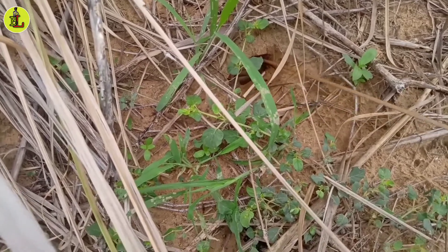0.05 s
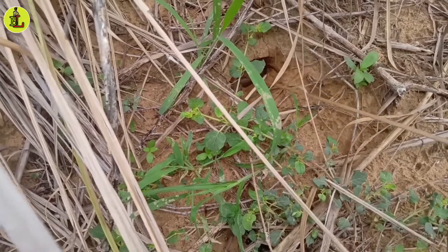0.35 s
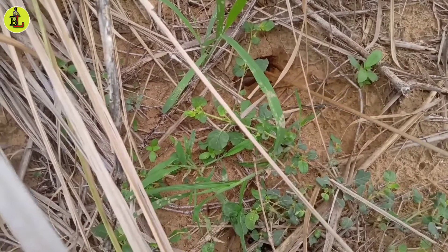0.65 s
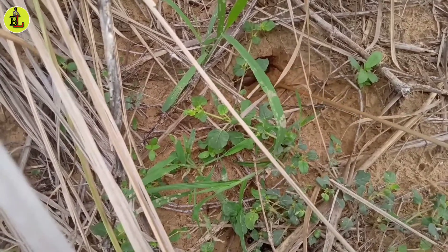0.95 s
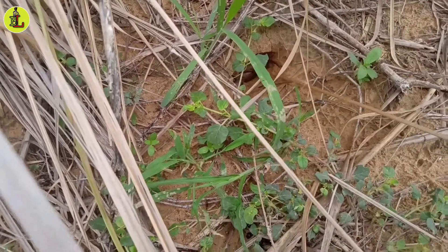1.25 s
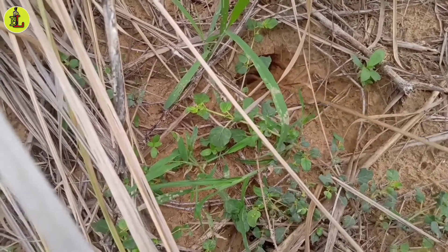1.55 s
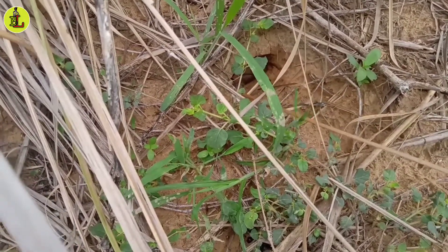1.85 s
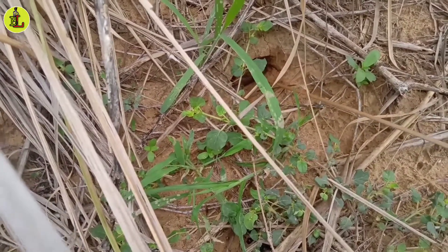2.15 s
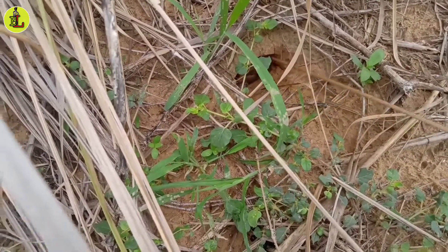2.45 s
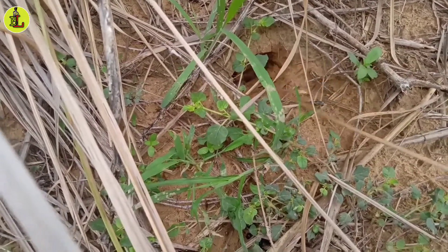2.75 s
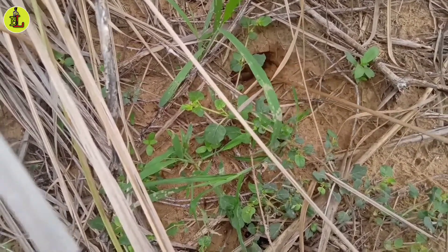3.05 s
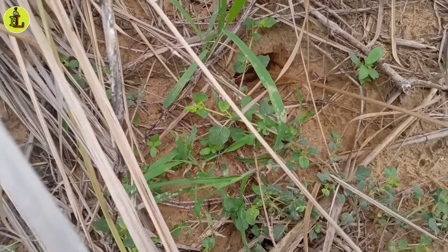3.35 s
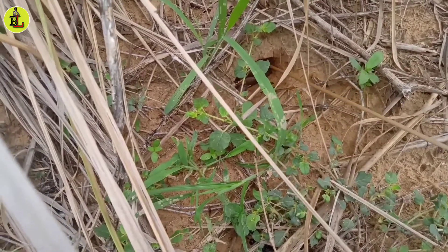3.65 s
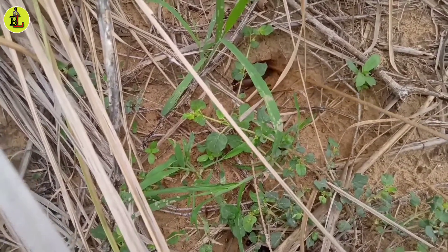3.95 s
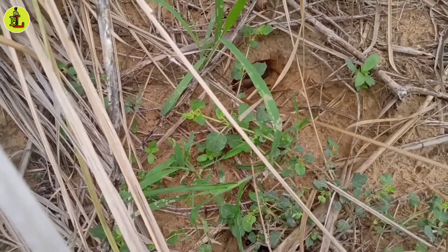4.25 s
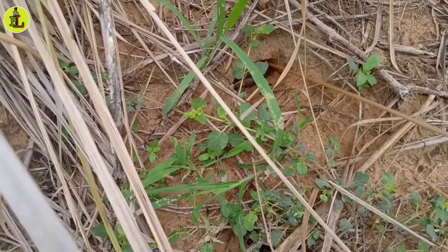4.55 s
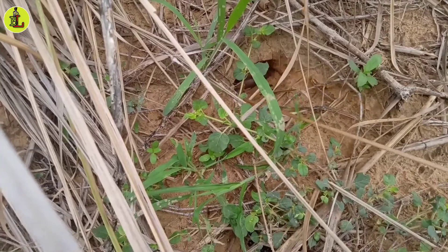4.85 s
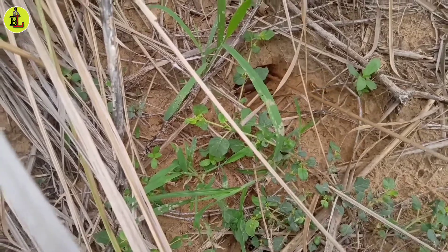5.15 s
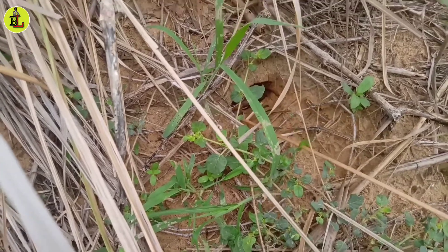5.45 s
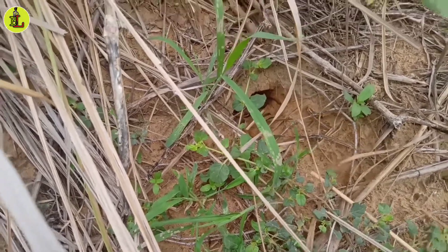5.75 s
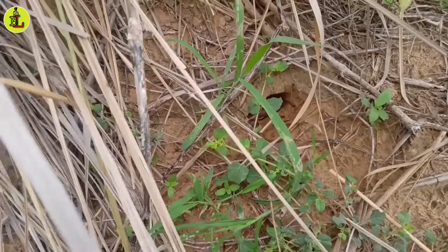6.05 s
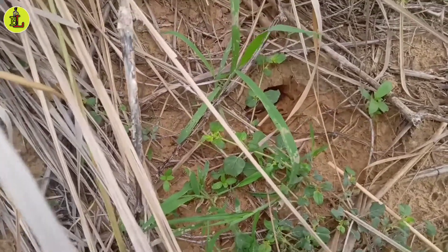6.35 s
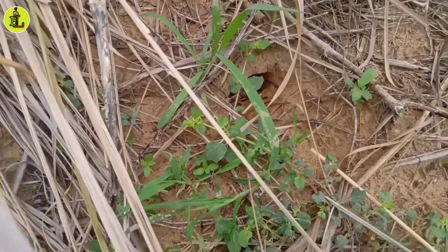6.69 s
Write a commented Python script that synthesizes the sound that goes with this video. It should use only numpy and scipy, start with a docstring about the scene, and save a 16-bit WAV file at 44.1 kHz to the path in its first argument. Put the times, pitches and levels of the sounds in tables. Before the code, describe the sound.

Close, scattered ticks and light scrapes of dry stalks outdoors, over a soft low rumble and distant bird calls.

```python
"""A quiet field, with dry grass disturbed close by. The blades move by stick-slip friction: they scrape
over each other, catch and snap free, and each release excites the damped modes of the stalks.
Small birds and a dove call far off in gliding tones, over a low rumble and a hush of air.
One thin, very high squeak arches up and down, loudest as its pitch crosses two resonances.
At the end a hand bumps the camera, whose body answers with a dull thump."""
import sys
import numpy as np
from scipy import signal
from scipy.fft import rfft
from scipy.io import wavfile
from scipy.ndimage import uniform_filter1d

SR = 44100
rng = np.random.default_rng(int(sys.argv[2]) if len(sys.argv) > 2 else 0)


def dump_mix(stems):
    """Bounce the given channels to the path in sys.argv[1] as a 16-bit WAV at rate SR."""
    frames = np.atleast_2d(stems).T  # one column per channel
    limited = np.clip(frames, -1, 1)  # hard clip at full scale
    pcm = np.round(limited * 32767).astype(np.int16)
    wavfile.write(sys.argv[1], SR, pcm)


N = 296376

# spectrum of the far rumble: (frequency [Hz], relative density [dB])
RUMBLE_SPECTRUM = [(20, -15), (40, -19.5), (70, -4.5), (110, -1), (155, 1.5), (200, -4), (260, -13.5),
                   (400, -25.5), (900, -57)]
# envelope of the far rumble: (time [s], level [dB])
RUMBLE_LEVELS = [(0.0, -56), (0.18, -60), (3.6, -59), (4.1, -61), (6.6, -62.5)]
# spectrum of quiet air and hiss: (frequency [Hz], relative density [dB])
AIR_SPECTRUM = [(100, -12.5), (250, 5), (400, 3), (600, 1), (1000, -3), (2000, -5.5), (3600, -7),
                (4700, -17), (6400, -20.5), (7400, -14), (8300, -19.5), (9500, -21.5), (13000, -23.5),
                (15500, -23)]
# notes of small birds:
# (start [s], length [s], relative level [dB], first pitch [Hz], middle pitch [Hz], last pitch [Hz])
BIRD_NOTES = [(1.861, 0.022, -57.5, 2530, 2890, 2920), (2.197, 0.024, -65, 2430, 2330, 2260),
              (2.21, 0.067, -59.5, 3010, 3125, 3140), (2.277, 0.026, -66.5, 2470, 2420, 2320),
              (2.305, 0.059, -72, 4130, 3900, 3700), (3.69, 0.069, -71, 4400, 3760, 3250),
              (5.073, 0.05, -73, 3080, 2850, 2720), (5.265, 0.041, -66, 2900, 2990, 2880),
              (5.452, 0.16, -62.5, 3870, 2940, 2670)]
# coos of a dove:
# (start [s], length [s], relative level [dB], first pitch [Hz], middle pitch [Hz], last pitch [Hz])
DOVE_NOTES = [(.2, 0.39, -72, 570, 582, 551), (.9, 0.27, -71, 575, 585, 560),
              (3.55, 0.15, -72, 587, 566, 565), (3.85, .37, -73, 554, 550, 552),
              (4.6, 0.23, -72, 577, 553, 513)]
# arch of the squeak: (time [s], pitch [Hz])
SQUEAK_PITCH = [(3.238, 3600), (3.244, 4700), (3.246, 8550), (3.252, 9200), (3.255, 11740), (3.288, 13000),
                (3.298, 11400), (3.303, 8450), (3.309, 8140), (3.315, 5440), (3.323, 3470)]
# response with two resonances that the squeak crosses: (frequency [Hz], relative level [dB])
SQUEAK_RESPONSE = [(3300, -65), (4450, -51.5), (5300, -50.5), (7000, -55), (8500, -47), (9200, -54),
                   (10500, -73), (13000, -75)]
# modes of the camera body: (frequency [Hz], relative level [dB], t60 [s])
CAMERA_MODES = [(132, -0.5, 0.017), (209, -1.5, 0.02), (467, 3, 0.0096), (910, -25, 0.01)]
# modes of a dry stalk: (frequency [Hz], relative level [dB], t60 [s])
STALK_MODES = [(2377, -5, .03), (2863, -8, .025), (3488, -6, .03), (3743, -2, .028), (4295, -2, .025),
               (4824, -8, .02), (5801, -2, .025), (6080, -7, .022), (6460, -6, .02), (6660, -2, .022),
               (7055, 0, .028), (7655, 0, .026), (8105, 0, .027), (9675, -3, .03), (10200, -3, .03),
               (10644, -5, .03)]
# slow pressure on the whole tuft: (time [s], relative level [dB])
TUFT_PRESSURE = [(0, -64), (0.1, -60), (0.33, -59), (0.42, -85), (0.95, -71.5), (1.31, -62.5), (1.47, -89),
                 (2.58, -66.5), (2.72, -82.5), (3.0, -65), (3.55, -82.5), (3.88, -65.5), (4.33, -65.5),
                 (4.55, -89.5), (5.42, -57.5), (5.62, -67.5), (6.2, -60.5), (6.27, -87.5)]
# filter that colours the stirring tuft: (frequency [Hz], gain [dB])
TUFT_SPECTRUM = [(200, -20), (1000, -9), (2000, -6), (3700, -5.5), (5500, 0), (6600, 3.5), (7600, 8),
                 (8400, 7.5), (9500, -1.5), (12000, -1), (15000, 5)]
# dull brushes against the litter: (middle [s], length [s], peak level [dB], centre frequency [Hz])
LITTER_BRUSHES = [(.191, 0.025, -50.5, 2310), (2.607, .014, -57.5, 1790), (6.108, 0.028, -58, 950),
                  (6.113, .02, -55, 2900), (6.601, .24, -63.5, 1710)]
# filter that colours rubbed dry leaf: (frequency [Hz], gain [dB])
LEAF_SPECTRUM = [(200, -28), (600, -2), (1100, -6), (1800, -6), (2600, -6.5), (3700, -1), (5500, -3.5),
                 (6600, 3.5), (7600, 7), (8400, 4), (9500, 2), (12000, -1.5), (15000, 5.5)]
# blades sliding without catching: (start [s], length [s], level at 5-10 kHz [dB], relative fizz [dB])
FREE_SLIDES = [(0.363, 0.0092, -64, 7), (0.811, .02, -60, 3), (0.977, 0.018, -58, -10),
               (1.254, 0.0047, -55.5, -2), (2.516, 0.0061, -50.5, -5), (2.571, 0.011, -57, -4),
               (2.598, .007, -58.5, -9), (3.033, 0.025, -56.5, -5), (3.412, .037, -65.5, -3),
               (3.887, 0.013, -59, .5), (3.918, .01, -53.5, -9), (4.87, 0.014, -55, -1),
               (5.386, .039, -59.5, -4), (5.481, 0.031, -55.5, -16), (5.681, .025, -60.5, -11),
               (5.743, .029, -63, -6), (5.817, 0.051, -52, -11), (5.882, 0.043, -53, -11),
               (6.078, 0.083, -55.5, -17), (6.224, 0.0079, -56, -15)]
# spectrum of the woody knock: (frequency [Hz], relative density [dB])
WOOD_SPECTRUM = [(150, -25.5), (350, -18), (550, -0.5), (1150, -1), (1700, -8.5), (3000, -13.5),
                 (8000, -34)]
# snaps of dry stalks and, a few milliseconds after some of them, their ground echoes (at 0.2811, 1.5422,
# 1.5579, 1.946 and 5.263 s), with knock, body and fizz relative to the crack; a slide of 0 means none: # (time
# [s], crack level [dB], knock [dB], body [dB], fizz [dB], crumbling t60 [s], slide before [s])
SNAPS_AND_ECHOES = [(0.0728, -58.5, -17, -16, 9.5, .005, 0.00042), (0.0877, -59, -18, -4, -3, 0.0085, 0),
                    (0.2622, -42.5, -20, -5.5, -3, 0.026, .02), (0.2773, -33, -14.5, -8.5, -4, 0.0045, 0.02),
                    (0.2811, -46, -16, -19, 2, .009, 0), (0.2866, -35, -22, -25, -2, 0.01, 0.0088),
                    (0.7665, -42, -21, -12, -0.5, .022, 0.013), (0.7696, -49, -30, -7, 9, 0.0083, 0),
                    (1.1671, -57, -14, -10, 4, .014, 0), (1.1754, -37.5, -14.5, -7.5, -7, 0.0059, 0.017),
                    (1.2091, -52.5, -14, -17, -7, .016, 0), (1.5383, -34.5, -10.5, -1.5, -13, 0.011, 0.0062),
                    (1.5422, -42, -15, -10, -1, 0.007, 0.0031), (1.5548, -38.5, -14, -12, -2, 0.0085, 0.00024),
                    (1.5579, -49, -19, -16, -5, .02, 0.0025), (1.724, -58.5, -16, -20, 0, .021, 0),
                    (1.9417, -38.5, -10.5, -1.5, -3, 0.021, .014), (1.946, -42, -17, -9, 3.5, .009, 0),
                    (1.961, -47, -12, -9, -3, .017, 0.005), (2.1542, -47, -29, -12, -2.5, 0.012, .026),
                    (2.4303, -49.5, -17, -7.5, 2.5, 0.0068, 0), (2.4789, -43, -14.5, -11, 1, 0.014, 0),
                    (2.5106, -56, -15, -5, 3, .006, 0), (2.8309, -21.3, -22, -6, -11, 0.0087, 0.01),
                    (2.853, -46, -19, -22, 1, 0.016, 0.0002), (2.9529, -55, -23, -15, 0, .008, 0.00013),
                    (3.0662, -50, -14, -11, 1, 0.012, 0.0037), (3.4653, -49, -15, -15, -1, 0.024, 0),
                    (3.4734, -46.5, 2.5, -6, 1, 0.015, 0.0016), (3.4867, -57.5, 6.5, 3.5, -4, 0.025, 0),
                    (3.702, -61.5, -14, -10, 5, .005, 0.00048), (3.7754, -37, -20.5, -9.5, -7, 0.012, .024),
                    (3.82, -59, -12, -11, 5, .005, 0.002), (3.9484, -57.5, -19, -6, -5, .016, 0),
                    (4.0406, -59.5, -18, -12, -2, 0.02, 0.0003), (4.0868, -60, -18, -17, 0, .006, 0),
                    (4.2552, -24.5, -19.5, -4.5, -13.5, 0.0083, 0.016),
                    (4.2659, -43.5, -5.5, -11, -5, .022, 0.00098), (4.2747, -47, -4, -19, 3, 0.0088, 0.0022),
                    (4.3572, -54.5, -23, -29, 4.5, 0.0046, 0), (4.4893, -44.5, -2.5, -2.5, -5, 0.019, .021),
                    (4.5194, -63, -14, -7, 7, .009, 0), (4.8292, -49, -21, -18, -1, 0.011, 0.015),
                    (4.8413, -46, -27, -14, -7, .014, 0.0044), (4.857, -37.5, -14, -9.5, 0, 0.0045, .01),
                    (4.9814, -47, -20, -9, -3.5, .011, 0), (5.0239, -52, -17, -13, -6, .016, 0.0046),
                    (5.031, -47.5, -13, -8.5, -2, .019, .008), (5.1492, -58, -18, -21, 1, 0.013, 0.001),
                    (5.26, -43, -17, -16, 1.5, 0.017, .019), (5.263, -41, -11.5, -11, 0.5, .022, 0),
                    (5.5257, -54.5, -14, -11, -2, .008, 0.0042), (5.641, -64, -18, -9, 1, .008, 0.00041),
                    (5.8117, -51, -16, -10, -8, 0.031, 0), (6.1101, -49, -11, -0.5, -8, .045, 0.0015),
                    (6.172, -53, -9, -2.5, -10, 0.0046, 0.0011)]


def gain_of(db):
    """Amplitude ratio for a level in decibels."""
    return 10 ** (np.asarray(db) / 20)


def decay(t, t60, db=0):
    """Exponential damping: an amplitude that starts at db and loses 60 dB every t60 seconds."""
    return gain_of(db - 60 * t / t60)


def unit_rms(x):
    """Normalisation to rms 1."""
    return x / np.sqrt(np.mean(x ** 2) + 1e-20)


def level_at(spectrum, hz):
    """Linear interpolation of a spectrum over log frequency."""
    frequencies, db = np.transpose(spectrum)
    return np.interp(np.log(hz + 1), np.log(frequencies + 1), db)


def envelope(rows):
    """Linear interpolation of levels over time, giving a gain for every sample."""
    times, db = np.transpose(rows)
    return gain_of(np.interp(np.arange(N) / SR, times, db))


def add(mix, start, sound):
    """Superposition: sums a sound into the mix from a start time in seconds."""
    part = mix[max(round(start * SR), 0):][:len(sound)]
    part += sound[:len(part)]


def colour(x, spectrum, size=4096):
    """Minimum-phase filtering: causal, so attacks stay sharp."""
    log_gain = np.log(gain_of(level_at(spectrum, abs(np.fft.fftfreq(size, 1 / SR)))))
    response = np.exp(np.conj(signal.hilbert(log_gain)))
    taps = np.fft.ifft(response).real[:size // 2]
    return signal.fftconvolve(x, taps)[:len(x)]


def band_energy(x, low_hz, high_hz):
    """Energy in a band, summed over the power spectrum."""
    hz = np.fft.rfftfreq(len(x), 1 / SR)
    return 2 * np.sum(abs(rfft(x)[(hz > low_hz) & (hz < high_hz)]) ** 2) / len(x) + 1e-20


def drift(count, seconds):
    """Low-pass noise of rms 1 that changes over the given time."""
    width = max(int(seconds * SR), 1)
    return unit_rms(uniform_filter1d(uniform_filter1d(rng.standard_normal(count), width), width))


def outdoors(x, near_db, far_db, near_t60=0.077, far_t60=0.4, echo_s=.0042, echo_db=-15):
    """Reflection and scattering: one ground echo, quick scatter from grass and a tail from the field."""
    t = np.arange(SR // 2) / SR
    near, far = (rng.standard_normal(len(t)) * decay(t, t60) * (t > echo_s)
                 for t60 in (near_t60, far_t60))
    taps = gain_of(near_db) * near / np.linalg.norm(near) + gain_of(far_db) * far / np.linalg.norm(far)
    add(taps, echo_s, gain_of([echo_db]))
    return x + signal.fftconvolve(x, taps)[:N]


def field(air_db=-62.5, waver_db=0.77):
    """Ambient noise under slow amplitude modulation: a wavering far rumble and a nearly even hush."""
    rumble = unit_rms(colour(rng.standard_normal(N), RUMBLE_SPECTRUM)) * envelope(RUMBLE_LEVELS)
    rumble *= gain_of(waver_db * drift(N, .05))
    air = unit_rms(colour(rng.standard_normal(N), AIR_SPECTRUM))
    return rumble + air * gain_of(air_db + 0.22 * drift(N, 0.051))


def tone(hz, waver, octave_db):
    """Frequency modulation: an unsteady sine, with a weak octave while its pitch is below SR / 8."""
    pitch = hz * (1 + waver * drift(len(hz), .002))
    phase = 2 * np.pi * np.cumsum(pitch) / SR
    return np.sqrt(2) * (np.sin(phase) + gain_of(octave_db) * (pitch < SR / 8) * np.sin(2 * phase))


def bird_calls(notes, waver, octave_db, swell):
    """Amplitude and frequency modulation: each note swells and fades as its pitch follows a parabola."""
    out = np.zeros(N)
    for start, length, db, *pitches in notes:
        progress = np.linspace(0, 1, int(length * SR), endpoint=False)
        hz = np.polyval(np.polyfit([0, .5, 1], pitches, 2), progress)
        arch = np.sin(np.pi * progress) ** swell
        add(out, start, gain_of(db) * arch * tone(hz, waver, octave_db))
    return out


def squeak(rise_db=2):
    """Swept resonance: a gliding tone is loud where it crosses a peak, and grows a little with time."""
    out = np.zeros(N)
    times, pitches = np.transpose(SQUEAK_PITCH)
    t = np.arange(times[0], times[-1], 1 / SR)
    hz = np.interp(t, times, pitches)
    db = level_at(SQUEAK_RESPONSE, hz) + rise_db * np.linspace(-.5, .5, len(t))
    amplitude = gain_of(db) * signal.windows.tukey(len(t), .05)
    add(out, times[0], amplitude * tone(hz, waver=0.01, octave_db=-14))
    return out


def camera_bump(start=6.6765, thump_gain_db=-23, rub_db=-50, rub_t60=0.25):
    """Impact: a hand excites the damped modes of the camera body, and skin friction lingers after it."""
    out, t = np.zeros(N), np.arange(SR // 10) / SR
    thump = sum(decay(t, t60, db) * np.sin(2 * np.pi * hz * t) for hz, db, t60 in CAMERA_MODES)
    thump = colour(thump, [(15, -36), (40, -29), (70, -5), (110, 1.5)])  # little deep bass passes
    skin = [(30, -20), (100, -15), (900, -6), (1700, -7), (3500, -4.5), (6000, -10.5), (15000, -22)]
    rub = unit_rms(colour(rng.standard_normal(len(t)), skin))
    add(out, start, gain_of(thump_gain_db) * thump + decay(t, rub_t60, rub_db) * rub)
    return out


def friction(count, per_s, spread_db, smooth):
    """Shot noise: tiny random slips of uneven size over a smooth rub."""
    size = gain_of(spread_db * np.minimum(rng.exponential(1, count), 4))
    slips = size * rng.choice([-1, 1], count) * (rng.random(count) < per_s / SR)
    return unit_rms(slips) + smooth * rng.standard_normal(count)


def stalk(push, ring_db):
    """Modal resonance: a push is heard directly and through the short-lived modes of a stalk."""
    t = np.arange(SR // 20) / SR
    detunings = 1 + .003 * rng.standard_normal(len(STALK_MODES))
    ring = sum(decay(t, t60, db + ring_db) * np.cos(2 * np.pi * hz * detune * t)
               for (hz, db, t60), detune in zip(STALK_MODES, detunings))
    return push + signal.fftconvolve(push, ring)[:len(push)]


def catches(usual_snap_db=-40, force_share=0.5):
    """Stick-slip events, the rows that follow a slide: (time [s], slide [s], relative force [dB])."""
    return [(time, slide, force_share * (db - usual_snap_db))
            for time, db, *_, slide in SNAPS_AND_ECHOES if slide > 0]


def tuft_stir(gain_db=-9, shake_db=-63.5, shake_t60=0.44, stray_db=-84):
    """Incoherent sources add in power: the tuft crackles under slow pressure and after each catch."""
    out, t = np.zeros(N), np.arange(SR // 2) / SR
    power = envelope(TUFT_PRESSURE) ** 2
    for time, _, force in catches():
        add(power, time, decay(t, shake_t60, shake_db + force) ** 2)
    strength = gain_of(gain_db) * np.sqrt(power)
    clumps = gain_of(3 * drift(N, .005))
    for blade_hz in np.geomspace(3500, 14000, 5):  # every blade has a pitch of its own
        crackle = friction(N, per_s=300, spread_db=3.5, smooth=.4) * clumps
        stray_ticks = friction(N, per_s=7, spread_db=2.5, smooth=0)
        resonance = signal.iirpeak(blade_hz, Q=2, fs=SR)
        out += signal.lfilter(*resonance, strength * crackle + gain_of(stray_db) * stray_ticks)
    return colour(out, TUFT_SPECTRUM)


def litter_brushes():
    """Band-limited friction noise: soft mid-range swells of rubbing against the litter."""
    out = np.zeros(N)
    for middle, length, db, hz in LITTER_BRUSHES:
        count = int(2 * length * SR)
        band = [(hz / 8, -18), (hz / 2, -1), (hz, 0), (hz * 1.53, -2), (hz * 2.4, -18), (hz * 5, -35)]
        rub = colour(friction(count, per_s=5400, spread_db=3, smooth=.8), band)
        add(out, middle - length, gain_of(db) * unit_rms(rub) * np.hanning(count) ** 3)
    return out


def blade_scrapes(stick_s=.005, spring_delay_s=.013, spring_s=0.011, release_s=0.005, fizz_lift_db=4):
    """Sliding friction, a dense run of slips: blades glide freely, lead into a catch or spring back."""
    out, t = np.zeros(N), np.arange(SR // 7) / SR
    # rows like those of FREE_SLIDES, before and after each catch
    leading = [(time - stick_s - slide, slide, -56.5 + force, -2.5) for time, slide, force in catches()]
    springing = [(time + spring_delay_s, spring_s, -62 + force, -4.5) for time, _, force in catches()]
    for start, length, db, fizz in FREE_SLIDES + leading + springing:
        pressure = np.interp(t, [0, length * 2 / 3], [0.84, 1])
        pressure *= np.exp(-np.maximum(t - length, 0) / release_s)
        slips = friction(len(t), per_s=3000, spread_db=3.3, smooth=.5)
        slips *= gain_of(2.3 * drift(len(t), .002))
        rub = colour(stalk(pressure * slips, ring_db=-53.5), LEAF_SPECTRUM)
        rub = colour(rub, [(8000, 0), (12000, fizz + fizz_lift_db)])
        rub /= np.sqrt(band_energy(rub, 5000, 10000) / (length * SR))
        add(out, start, gain_of(db) * rub)
    return out


def straw_ticks(count=18, floor_db=-70, knock_db=-17, body_db=-10, fizz_db=0, t60=0.0069):
    """Random point process: single straws snap more often under pressure; rows as in SNAPS_AND_ECHOES."""
    odds = np.cumsum(envelope(TUFT_PRESSURE) ** 0.52)
    rows = []
    for when, rarity in rng.random((count, 2)):
        time = np.searchsorted(odds, when * odds[-1]) / SR
        db = floor_db - 2 * np.log(max(rarity, .03))
        rows.append((time, db, knock_db, body_db, fizz_db, t60, 0))
    return rows


def stalk_snaps(crumble_db=-15, knock_t60=0.028, knock_rise_s=0.0011, knock_trim_db=-1):
    """Brittle fracture: an impulse, then crumbling fibres; a stout stalk has more body and knock. The ground
    echoes in the table are built the same way."""
    out, t = np.zeros(N), np.arange(SR // 10) / SR
    impulse = t == 0
    attack = SR // 230  # the first 4 ms set the level of each part
    body_band, crack_band, fizz_band = (signal.butter(3, hz, "band", fs=SR, output="sos")
                                        for hz in ([2550, 5200], [5600, 8700], [9600, 16000]))
    for time, db, knock_db, body_db, fizz_db, t60, _ in SNAPS_AND_ECHOES + straw_ticks():
        coarse, fine, blow = rng.standard_normal((3, len(t)))
        ringing = stalk(impulse + decay(t, t60, crumble_db) * coarse, ring_db=-33)
        fibres = impulse + decay(t, 1.37 * t60, crumble_db) * fine  # the finest fibres let go last
        knock = colour(blow * decay(t, knock_t60) * (1 - np.exp(-t / knock_rise_s)), WOOD_SPECTRUM)
        parts = [(knock, knock_db + knock_trim_db),
                 (signal.sosfilt(body_band, ringing), body_db),
                 (signal.sosfilt(crack_band, ringing), 0),
                 (signal.sosfilt(fizz_band, fibres), fizz_db)]
        for part, part_db in parts:
            add(out, time, gain_of(db + part_db) * part / np.sqrt(np.mean(part[:attack] ** 2)))
    return out


def scene():
    """Superposition in one channel: near grass is mostly direct sound, far birds carry more scatter."""
    grass = stalk_snaps() + blade_scrapes() + litter_brushes() + tuft_stir()
    near_grass = outdoors(grass, near_db=-31.5, far_db=-30)
    small_birds = bird_calls(BIRD_NOTES, waver=0.0095, octave_db=-37, swell=0.63)
    dove = bird_calls(DOVE_NOTES, waver=0.0057, octave_db=-20, swell=0.32)
    near_squeak = outdoors(squeak(), near_db=-19, far_db=-20)
    far_birds = gain_of(-1.5) * outdoors(small_birds + dove, near_db=-4, far_db=-11, near_t60=.09)
    return (near_grass + near_squeak + far_birds + field() + camera_bump())[None]


def record(dry):
    """Band limiting: a linear-phase low-pass filter removes the highest treble."""
    low_pass = signal.firwin(255, cutoff=15550, window=("kaiser", 8), fs=SR)
    return signal.oaconvolve(dry, low_pass[None], "same")


dry = scene()
out = record(dry)
dump_mix(out)
```